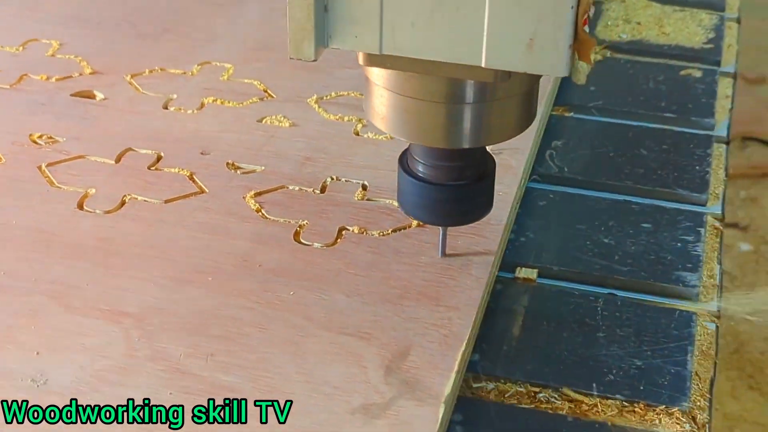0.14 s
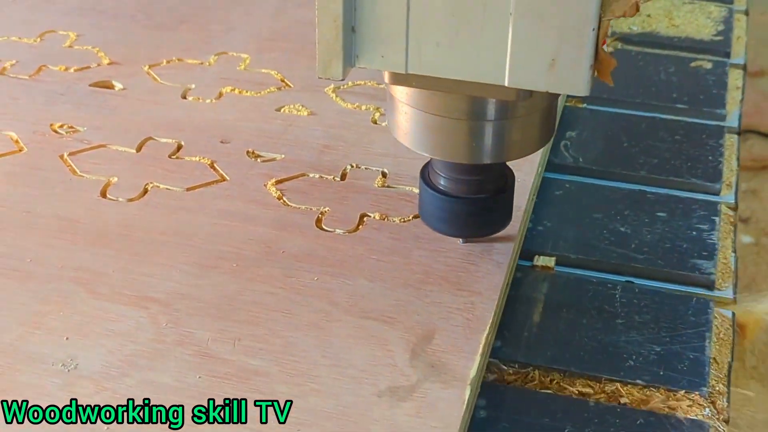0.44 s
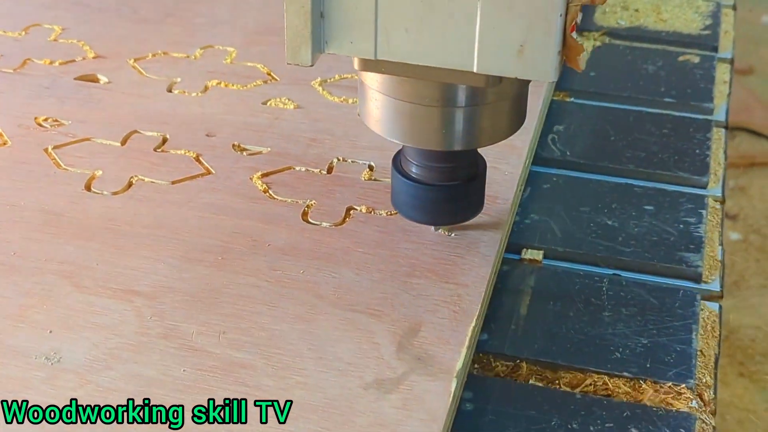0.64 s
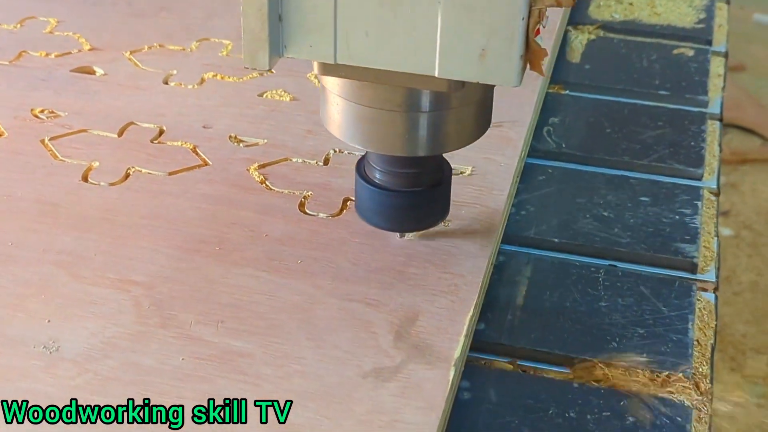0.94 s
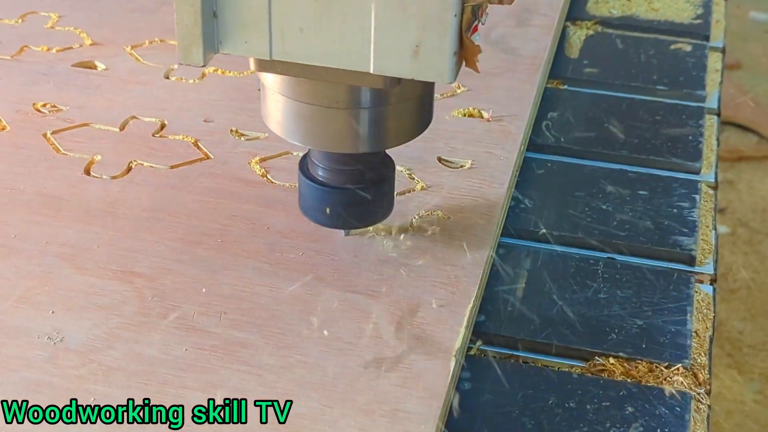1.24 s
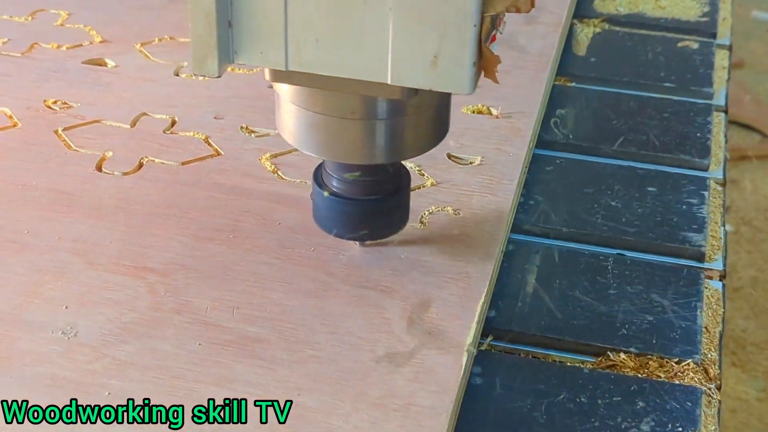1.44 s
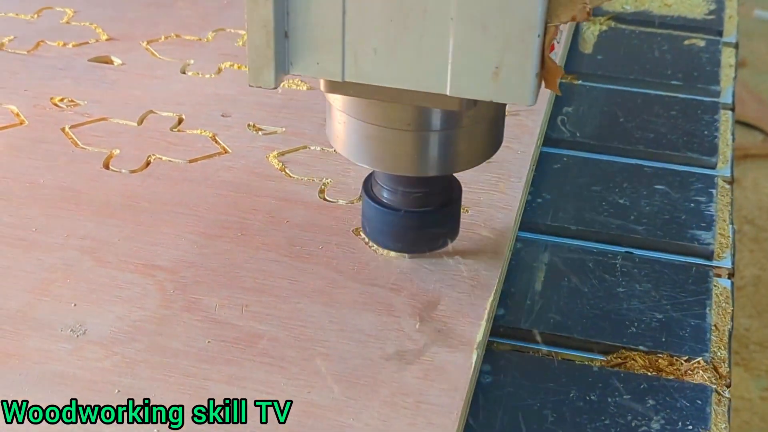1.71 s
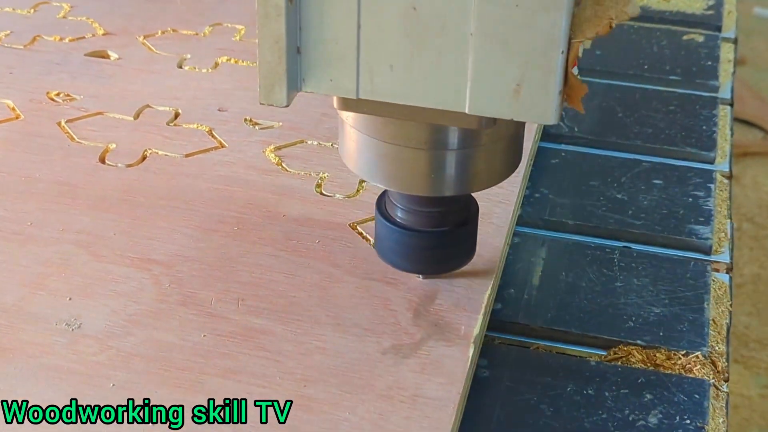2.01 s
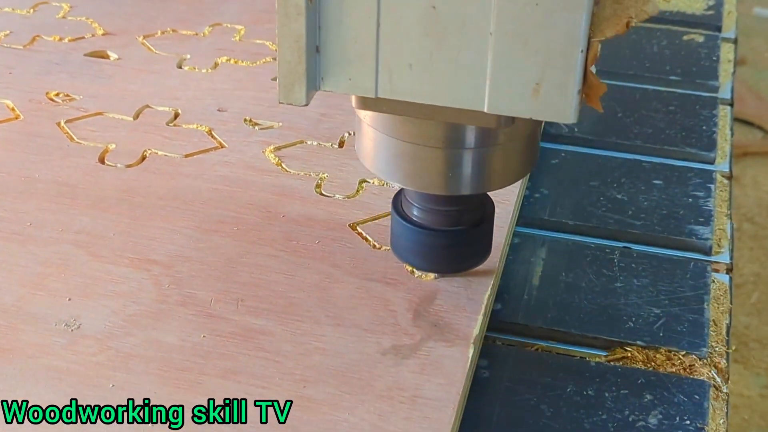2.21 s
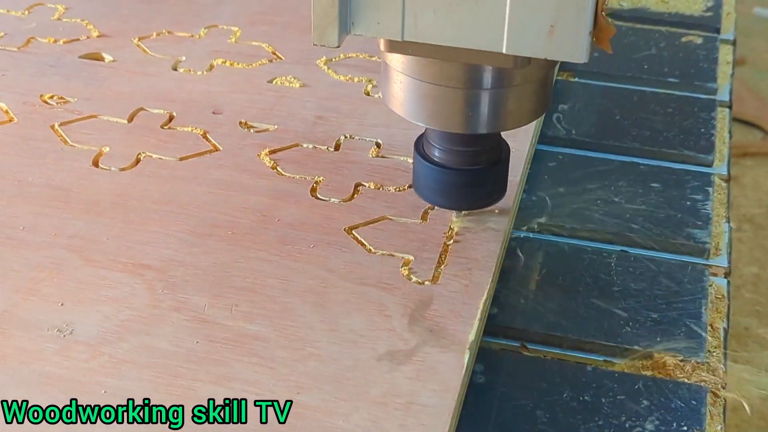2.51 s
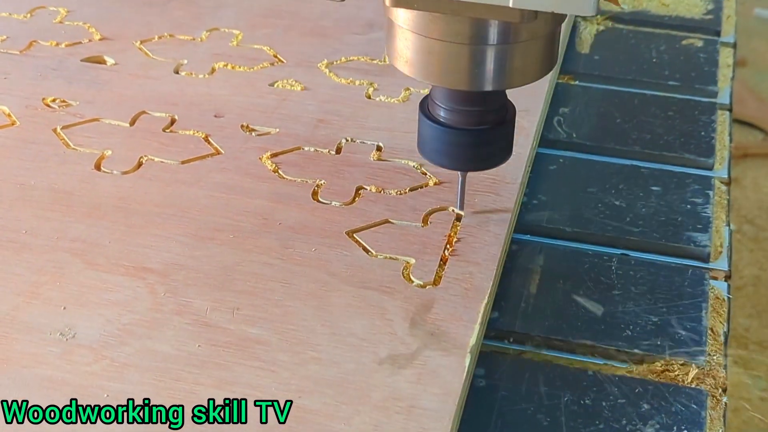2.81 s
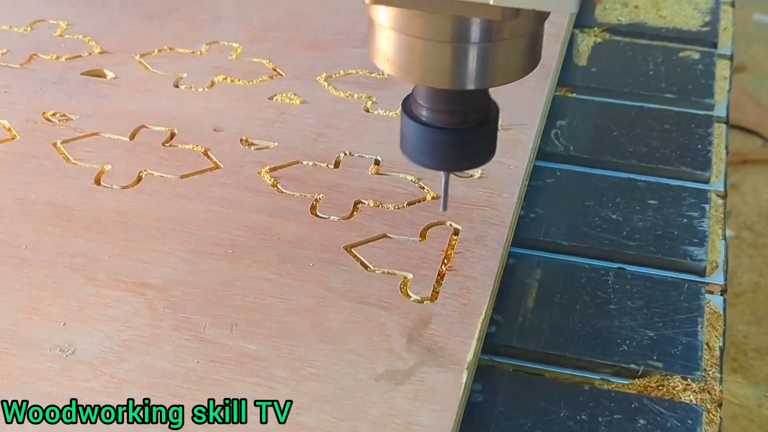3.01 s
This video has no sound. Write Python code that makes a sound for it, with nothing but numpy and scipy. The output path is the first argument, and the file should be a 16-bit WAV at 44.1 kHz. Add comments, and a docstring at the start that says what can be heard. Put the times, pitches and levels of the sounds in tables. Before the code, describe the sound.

A router spindle roars and whines steadily while its cutter plunges into wood, hums, squeals and lifts out.

```python
"""Router cutting a wooden sheet

A spindle runs steadily in a workshop: air noise roars through many resonances of motor housing and frame.
Over broad shop noise, a motor whistle (sine) and three whining noise bands, the cutter plunges into the
sheet, hums on multiples of the spindle speed, shakes up a low noise rumble, squeals in short sines, and
lifts out. Two spaced microphones: the left one hears the roar first."""
import sys
import numpy as np
from scipy import signal
from scipy.fft import irfft, next_fast_len
from scipy.io import wavfile

SR = 44100
rng = np.random.default_rng(int(sys.argv[2]) if len(sys.argv) > 2 else 0)


def int16_out(signal):
    """Quantize to a 16-bit WAV file."""
    q = np.round(np.clip(np.atleast_2d(signal).T, -1, 1) * 32767)
    wavfile.write(sys.argv[1], SR, q.astype(np.int16))


N = 138915
TIME_S = np.arange(N) / SR
PLUNGE_S, LIFT_S = 0.461, 2.61
SPINDLE_HZ = 298.9  # before sag and wander


def amp(db):
    """dB to gain."""
    return 10 ** (np.asarray(db) / 20)


def follow(rows):
    """Join a table's points by straight lines in time: one curve for each column after time_s."""
    time_s, *columns = np.transpose(rows)
    return [np.interp(TIME_S, time_s, column) for column in columns]


def drift(corner_hz):
    """Slow random curve of mean 0 and spread about 1: noise through two equal one-pole lowpasses."""
    step = 64  # samples between the points of the curve
    pole = np.exp(-2 * np.pi * corner_hz * step / SR)
    noise = rng.standard_normal(N // step + 1002)
    slow = signal.lfilter([1], [1, -2 * pole, pole ** 2], noise)[1000:]  # drop the run-in
    slow = (slow - slow.mean()) / slow.std()
    return np.interp(np.arange(N) / step, np.arange(len(slow)), slow)


def gate(start_s, length_s, edge_s):
    """0 to 1 and back; each linear edge is centred on the start or the end."""
    inside_s = np.minimum(TIME_S - start_s, start_s + length_s - TIME_S)
    return np.clip(inside_s / edge_s + 0.5, 0, 1)


def stereo_noise(gain, likeness, lead_rad):
    """Noise of amplitude gain(Hz) per root Hz; the right side is partly a phase-turned copy of the left."""
    size = next_fast_len(N)
    hz = np.fft.rfftfreq(size, 1 / SR)
    spectra = rng.standard_normal((2, len(hz))) + 1j * rng.standard_normal((2, len(hz)))
    left, other = spectra * np.sqrt(size * SR / 4)
    alike = np.clip(likeness(hz), 0, 1)
    right = alike * left * np.exp(-1j * lead_rad(hz)) + np.sqrt(1 - alike ** 2) * other
    return irfft(gain(hz) * np.array([left, right]), size)[:, :N]


def resonance(centre_hz, width_hz, likeness, lead_rad):
    """Noise through a steep resonance, 0 dB per Hz on top and 3 dB down across its width."""
    left_lead_s = 0.00025  # tilts the phase around the centre, where the left leads by lead_rad

    def gain(hz):
        detune = (hz - centre_hz ** 2 / (hz + 1)) / width_hz
        return 1 / (1 + detune ** 2 * (np.sqrt(2) - 1))

    return stereo_noise(gain, lambda hz: likeness,
                        lambda hz: lead_rad + 2 * np.pi * (hz - centre_hz) * left_lead_s)


def tone(turns, level_db, lead_rad, pan_db=0):
    """A sine of rms level_db from its running phase in turns; the left leads by lead_rad."""
    angle = 2 * np.pi * (turns + rng.random())
    left = amp(pan_db / 2) * np.sin(angle)
    right = amp(-pan_db / 2) * np.sin(angle - lead_rad)
    return np.sqrt(2) * amp(level_db) * np.array([left, right])


def roar():
    """Air noise coloured by housing and frame: each resonance flickers and shifts with cut and travel."""
    # resonances: centre_hz, width_hz, level_db (per Hz), cut_db (added in the cut, taken off outside it),
    # likeness (left-right, 0-1), lead_rad (left ahead)
    resonances = [(114, 21, -97.5, -1, 0.98, -1.2), (175, 37, -90, 4.5, 1, -0.2),
                  (298.6, 45.6, -75.5, 4, 0.89, 1), (468, 40, -63, -1, 0.51, 0.87),
                  (700, 93, -60, -0.13, 0.87, 0.25), (782, 77, -61, -0.5, 0.93, 0.65),
                  (916, 99, -68, 1.1, 0.98, 0.6), (998, 66, -70.5, -1, 0.55, 1.9),
                  (1139, 56, -70.5, -0.8, 0, 2.5), (1320, 57, -68, 1, 0.7, 3.5),
                  (1497, 95, -68.5, -2, 0.1, 2), (1602, 66, -66.5, 0, 0.64, 1.5),
                  (1752, 78, -62, -1, 0.59, 3), (1901, 131, -63.5, -0.5, 0.5, 3.5),
                  (2227, 124, -68.5, -.5, 1, -1.15), (2557, 134, -63.5, 0, 0.6, 1.13),
                  (2930, 80, -98, 0, 0.5, 0), (3148, 134, -62.5, 0, 0.53, 0.37),
                  (3290, 80, -67.5, 4, 0, 0.4), (3540, 100, -66, 4, 0.8, -2.2),
                  (3850, 132, -61.5, -1, 0.8, 1.35), (4218, 146, -65.5, 1, 0.1, 1),
                  (4428, 50, -67, 1.5, 0.2, -4), (4776, 130, -70, -1, 0, -5), (5070, 200, -78, 2, 0.2, -5),
                  (5304, 210, -72, 0.5, 0.06, -6), (5580, 260, -80, 0.5, 0.6, 3),
                  (5895, 135, -69.5, 0, 0.25, -2), (6176, 86, -70, 1.5, 0.85, -1.7),
                  (6386, 333, -73, 1, 0.92, -1), (7140, 610, -79.5, -0.7, 1, -5),
                  (7900, 200, -98, 6, 1, 3.5), (8430, 310, -85.5, -0.7, 0, 1),
                  (8950, 370, -87, 0.5, 0.2, -1.1), (9920, 430, -94, 1, 0, 4),
                  (11140, 150, -105, -0.5, 0.1, -4), (11600, 340, -109, -4, .15, 1)]
    # flicker of a resonance by its pitch: centre_hz, spread_db
    flicker = [(100, 3), (700, 1.25), (1500, 2.7), (2800, 1.5), (6000, 1.93), (10000, 2.5)]
    # how far the head is from its parking side: time_s, travel (0-1)
    head_path = [(0, 0.36), (.5, 0.14), (.85, 0.32), (1.1, 0.6), (1.5, 0.51), (1.75, 0.52), (2.1, 0.2),
                 (2.7, 0.14), (3.15, 0.53)]
    # change of colour from the parking side to full travel: centre_hz, change_db
    travel_colour = [(120, 5), (470, -3), (750, 0.5), (1150, -4), (1330, 0.5), (1750, -1), (2215, -7),
                     (2585, -4.5), (3230, 2), (3490, 3), (3820, 21), (4200, 0), (5250, -0.5), (6300, 3),
                     (9000, 4.6)]
    settle_s = 0.13  # the colour changes over this time as the head sinks or lifts
    cutting = gate(PLUNGE_S, LIFT_S - PLUNGE_S, settle_s)
    travel = follow(head_path)[0] - 0.5
    shared_db = 0.28 * drift(13.0)  # a small flicker common to all resonances
    out = 0
    for centre_hz, width_hz, level_db, cut_db, likeness, lead_rad in resonances:
        travel_db = travel * np.interp(centre_hz, *np.transpose(travel_colour))
        flicker_db = np.interp(centre_hz, *np.transpose(flicker)) * drift(42)
        moved_db = level_db + cut_db * (2 * cutting - 1) + travel_db + flicker_db + shared_db
        out = out + resonance(centre_hz, width_hz, likeness, lead_rad) * amp(moved_db)
    return out


def shop():
    """Steady broad noise under the resonances, alike at both microphones only in the bass."""
    # spectrum of the shop noise: pitch_hz, level_db (per Hz)
    spectrum = [(20, -112), (50, -104), (90, -89), (200, -91), (400, -74.5), (800, -74), (1250, -102.5),
                (2500, -72.5), (5500, -87), (8000, -89), (10500, -108), (12500, -126)]
    pitch_hz, level_db = np.transpose(spectrum)
    alike_below_hz = 1400  # likeness is one half here
    return stereo_noise(lambda hz: amp(np.interp(np.log(hz + 1), np.log(pitch_hz), level_db)),
                        lambda hz: 1 / (1 + (hz / alike_below_hz) ** 2),
                        lambda hz: 0 * hz)


def motor_whistle(turns):
    """The motor whistles: one sine at 16 times the spindle speed, wavering in level."""
    # level of the whistle before its waver: time_s, level_db
    whistle_level = [(0, -55.5), (.5, -52), (.9, -57), (1.3, -58), (2, -53), (2.42, -47.5), (2.65, -53.5),
                     (2.86, -42.5), (3.15, -49)]
    level_db = follow(whistle_level)[0] + 3.5 * drift(8)
    return tone(16 * turns, level_db, lead_rad=3.9)


def whine():
    """Three narrow ringing bands of noise that swell and sink."""
    # bands, lowest first: centre_hz, width_hz, likeness (left-right, 0-1), lead_rad (left ahead)
    bands = [(2188, 32, .9, -1.15), (2594, 44, 1, 1.16), (3234, 71, 0.83, 0.8)]
    # their levels: time_s, lowest_db, middle_db, upper_db (all per Hz)
    band_levels = [(0, -61, -57, -61.5), (.3, -60, -55.5, -58), (.65, -57, -57, -57.5),
                   (.95, -63, -59, -64), (1.2, -67, -59, -63), (1.45, -66, -70, -72), (1.7, -60, -56, -71),
                   (1.899, -66, -58.5, -55.5), (2.2, -65.5, -59.5, -56), (2.4, -57, -70, -62),
                   (2.62, -61, -69, -54), (2.69, -56, -57, -57), (2.73, -61, -54, -52),
                   (2.79, -61, -52.5, -57), (2.95, -65, -61, -59), (3.03, -61, -55, -61),
                   (3.15, -62, -65, -66)]
    return sum(resonance(*band) * amp(level_db) for band, level_db in zip(bands, follow(band_levels)))


def cut_rumble():
    """The sheet shakes under the cutter: a low band of noise."""
    # the band, one row: centre_hz, width_hz, likeness (at most 1 is used), lead_rad (left ahead)
    rumble_band = (139, 82, 1.5, -0.25)
    # its level: time_s, level_db (per Hz)
    rumble_level = [(.45, -105), (.48, -87), (.9, -86), (1.25, -88), (1.8, -82), (2.27, -86), (2.32, -98),
                    (2.7, -105)]
    return resonance(*rumble_band) * amp(follow(rumble_level)[0])


def cut_hum(turns, cutting, twice_db, third_db, twice_lead_rad):
    """The flutes strike the wood every turn: sines at one to four times the speed, wavering together."""
    # hum at four times the speed: time_s, level_db
    fourth_level = [(.46, -58.5), (.9, -55), (1.1, -66), (1.5, -57), (2.2, -66), (2.32, -52), (2.52, -46.5),
                    (2.6, -50)]
    # the hum at the speed itself takes a share of the load's swing
    first_db = -58.5 + 0.34 * (twice_db - twice_db.mean())
    third_db = third_db + 3.0 * drift(12)
    hum = tone(turns, first_db, lead_rad=2.5, pan_db=0.5)
    hum = hum + tone(2 * turns, twice_db, twice_lead_rad)
    hum = hum + tone(3 * turns, third_db, lead_rad=0.76)
    hum = hum + tone(4 * turns, follow(fourth_level)[0], lead_rad=1.8)
    waver_db = 0.8 * drift(5.0)
    return cutting * hum * amp(waver_db)


def short_tones():
    """The cutter squeals in short tones, and the hum rings briefly at six times the speed: gated sines, each
    wandering in pitch and level."""
    # short tones (squeals; the last row is the hum at six times the speed), pitch and level before wandering:
    # start_s, length_s, pitch_hz, level_db, lead_rad (left ahead)
    tone_rows = [(1.47, .06, 5190, -52, 1.2), (1.52, .07, 6170, -49, -1.1), (1.83, .05, 5270, -51, 2.9),
                 (1.955, .11, 5848, -47, 1.0), (1.99, .1, 6150, -48, -2.9), (2.03, .05, 6480, -51, -.3),
                 (2.09, .1, 5250, -50, -1.2), (2.1, .16, 6165, -45, -2.8), (2.175, .07, 6766, -48, -.6),
                 (2.35, .08, 1783, -44, .7)]
    out = 0
    for start_s, length_s, pitch_hz, level_db, lead_rad in tone_rows:
        turns = np.cumsum(pitch_hz + 7.2 * drift(13.3)) / SR
        ringing = tone(turns, level_db + 3.5 * drift(6.9), lead_rad)
        out = out + gate(start_s, length_s, edge_s=0.023) * ringing
    return out


def scene():
    """Roar, shop noise, whistle, whine and the cut; the spindle slows under load."""
    # load on the cutter: time_s, twice_db (hum at twice the speed), third_db (at three times, before its
    # own waver), twice_lead_rad (left ahead at twice)
    load = [(.46, -47.5, -52.5, 1.4), (.56, -43, -53, 2.2), (.7, -46, -45.5, 2.2), (.84, -39, -53, 2),
            (.95, -41.5, -45, 3.9), (1.12, -46.5, -52.5, 4), (1.26, -43, -50, 3.1),
            (1.34, -48.5, -81, 0.71), (1.47, -36, -42, 2.2), (1.55, -49.5, -59, 1.6), (1.62, -43, -41, 1.4),
            (1.78, -44.5, -74, 1.3), (1.9, -35.5, -42, 1.75), (1.98, -37.5, -57, 1.1),
            (2.1, -46.5, -42.5, 1.3), (2.24, -44.5, -51.5, 1), (2.31, -37.5, -43.5, 1.7),
            (2.38, -36, -46, 1.4), (2.45, -36, -59, 2.1), (2.53, -36.5, -57, 1.8),
            (2.56, -50.5, -62.5, 3.2), (2.6, -53, -58, 2)]
    sag_hz, wander_hz, wobble_hz = 1.335, 0.41, 1.2  # loss at full load; spreads of slow and fast change
    cutting = gate(PLUNGE_S, LIFT_S - PLUNGE_S, edge_s=0.018)
    twice_db, third_db, twice_lead_rad = follow(load)
    sag = cutting * amp(twice_db - twice_db.max())
    turns = np.cumsum(SPINDLE_HZ - sag_hz * sag + wander_hz * drift(9.0)) / SR
    # only the hum of the cut carries the fast wobble
    wobbling_turns = turns + np.cumsum(wobble_hz * drift(23.3)) / SR
    machine = roar() + shop() + motor_whistle(turns) + whine()
    hum = cut_hum(wobbling_turns, cutting, twice_db, third_db, twice_lead_rad)
    return machine + cut_rumble() + hum + short_tones()


def record(dry):
    """Two microphones, the left a touch louder; the lowest bass and the top are cut."""
    left_db = 0.3  # left over right
    bass_cut = signal.butter(2, 28, "high", fs=SR, output="sos")
    top_cut = signal.cheby2(16, 50, 13000, fs=SR, output="sos")  # 50 dB down from 13 kHz up
    balanced = dry * amp([[left_db / 2], [-left_db / 2]])
    return signal.sosfilt(top_cut, signal.sosfilt(bass_cut, balanced))


dry = scene()
out = record(dry)
int16_out(out)
```